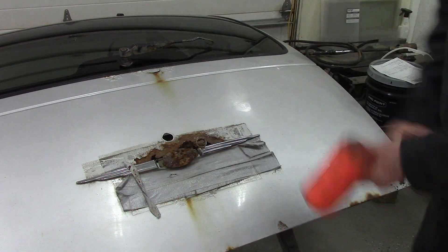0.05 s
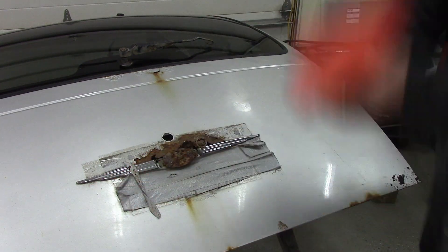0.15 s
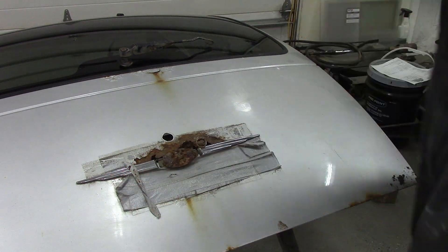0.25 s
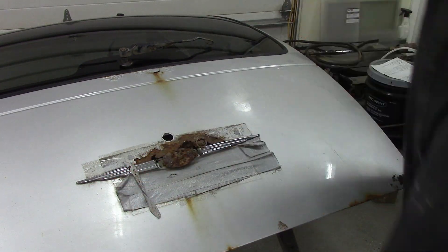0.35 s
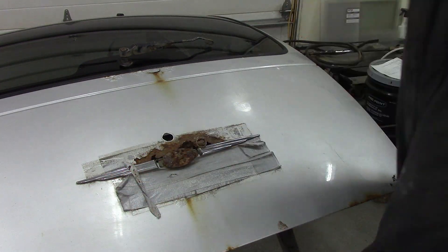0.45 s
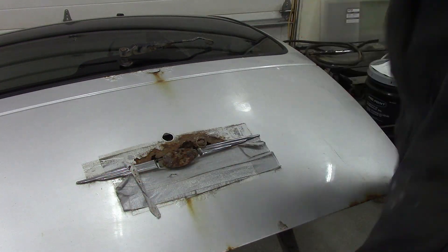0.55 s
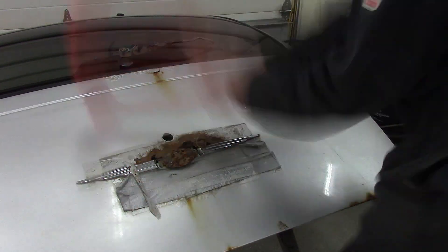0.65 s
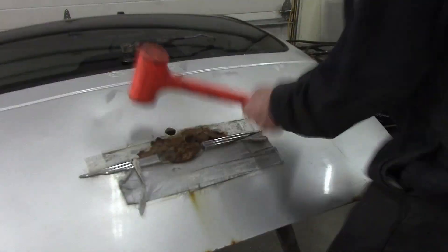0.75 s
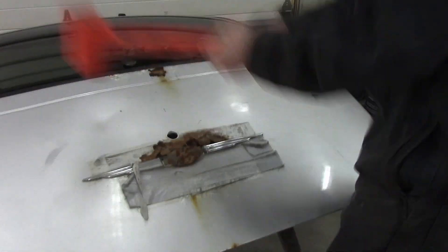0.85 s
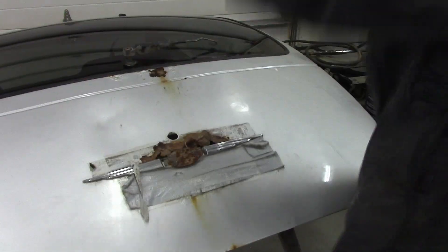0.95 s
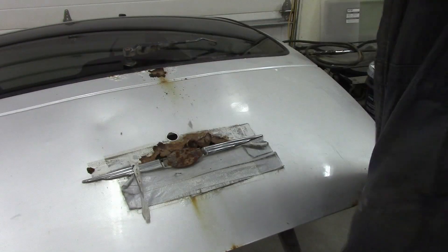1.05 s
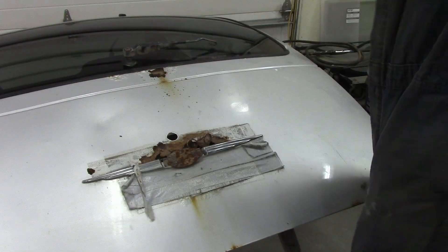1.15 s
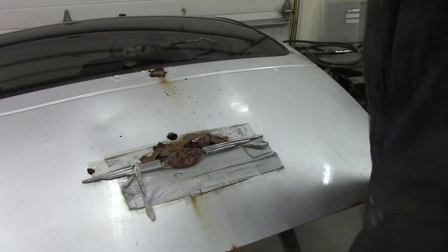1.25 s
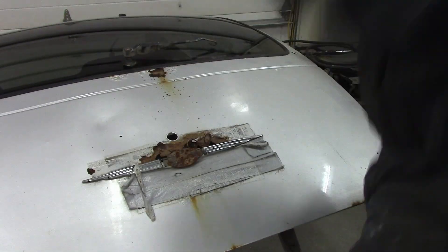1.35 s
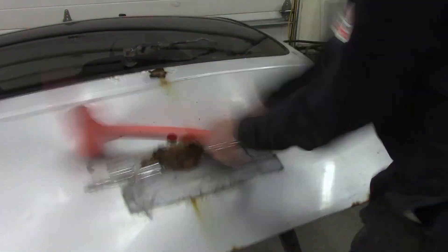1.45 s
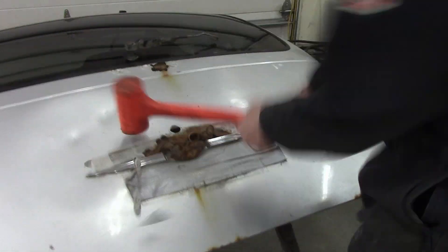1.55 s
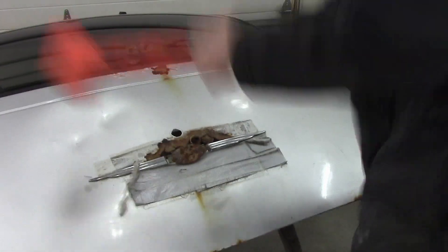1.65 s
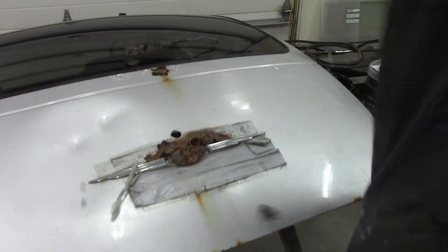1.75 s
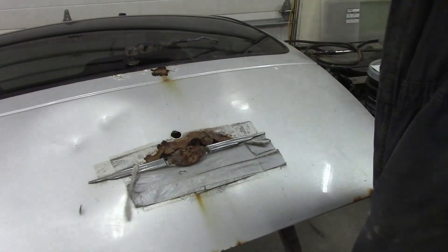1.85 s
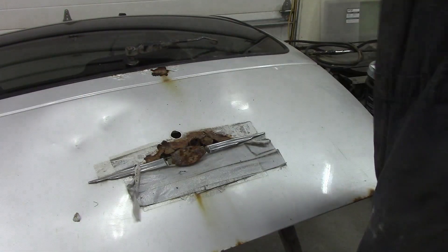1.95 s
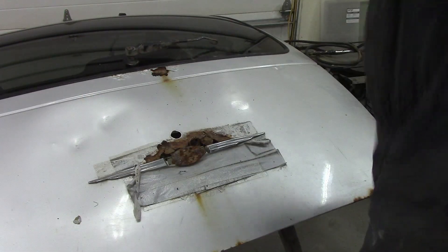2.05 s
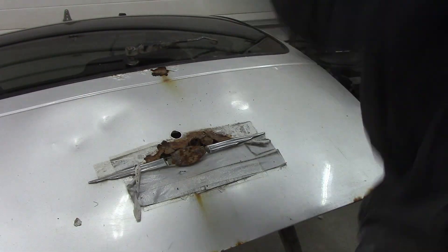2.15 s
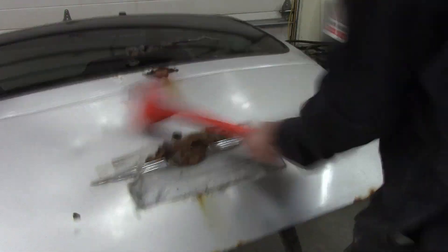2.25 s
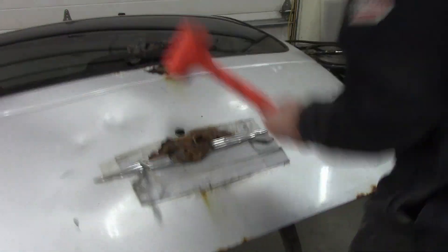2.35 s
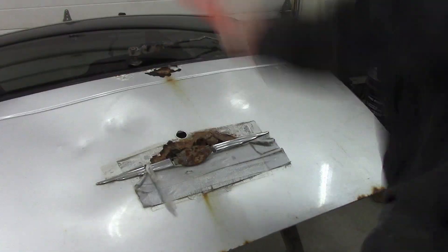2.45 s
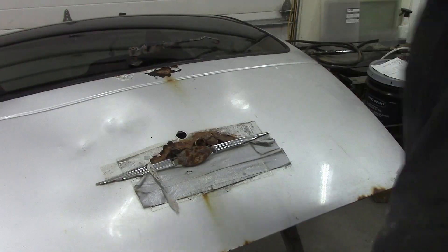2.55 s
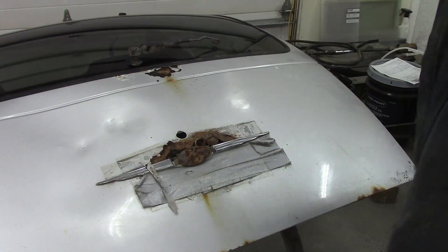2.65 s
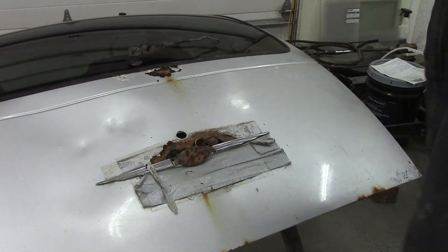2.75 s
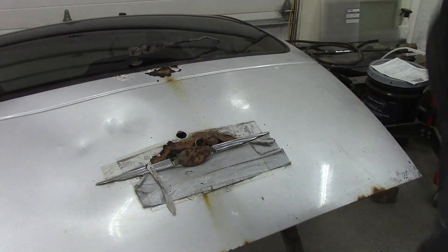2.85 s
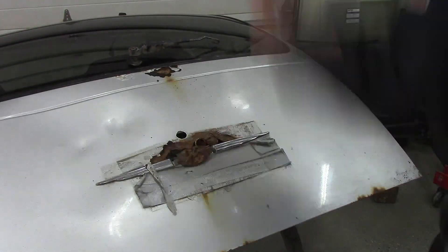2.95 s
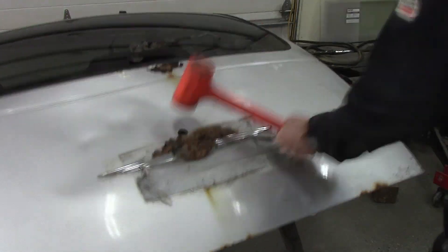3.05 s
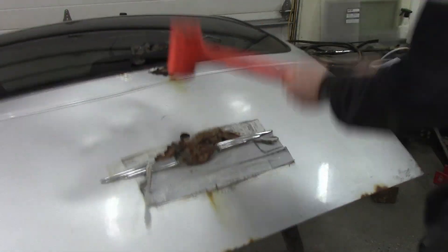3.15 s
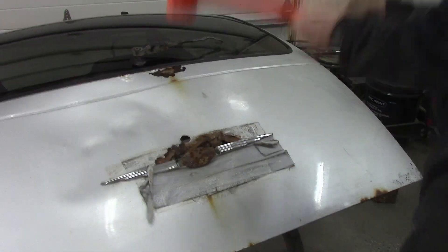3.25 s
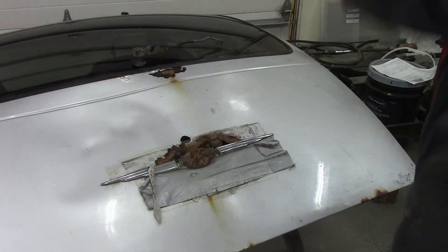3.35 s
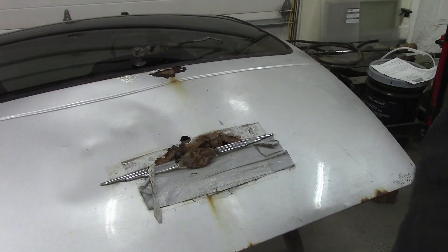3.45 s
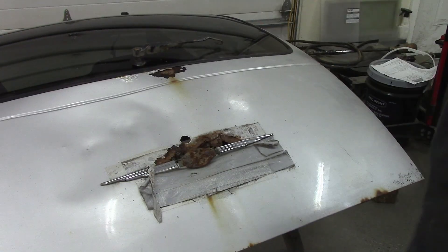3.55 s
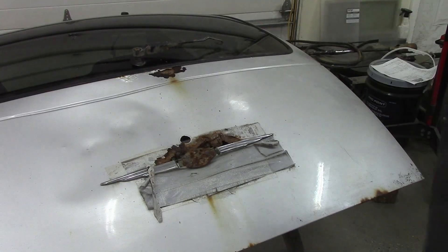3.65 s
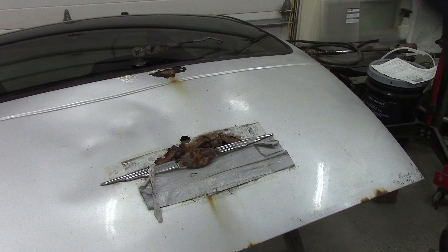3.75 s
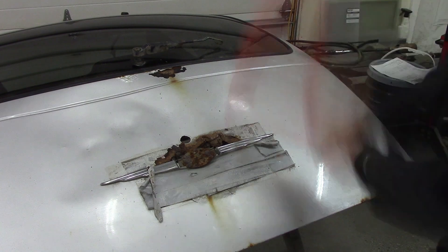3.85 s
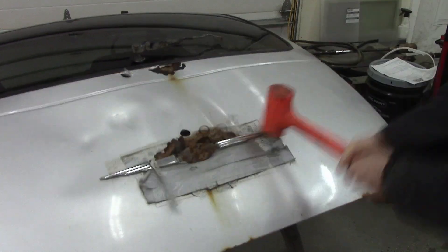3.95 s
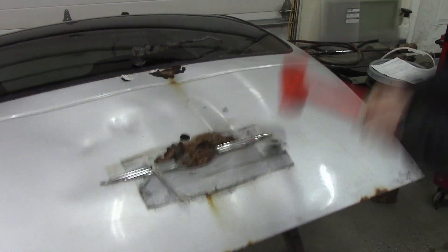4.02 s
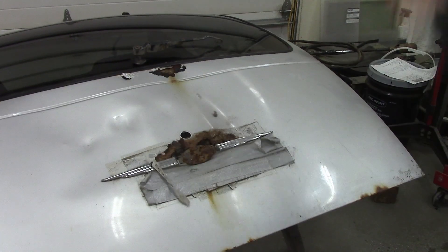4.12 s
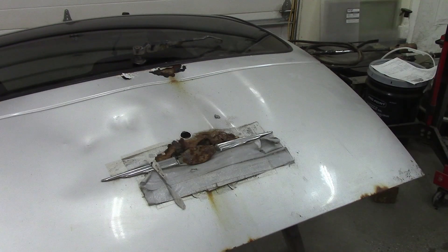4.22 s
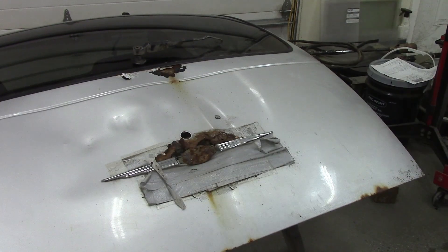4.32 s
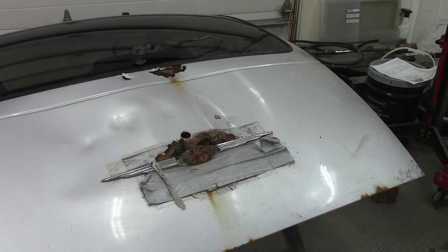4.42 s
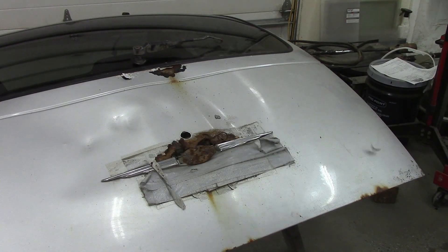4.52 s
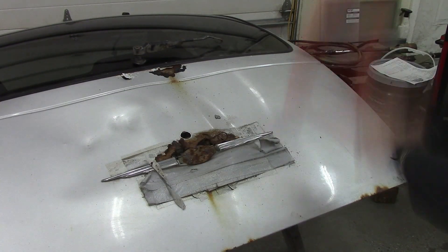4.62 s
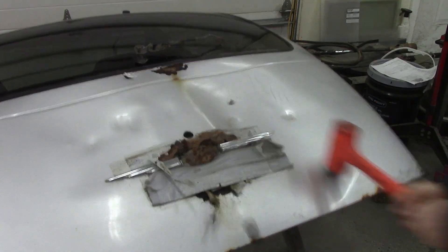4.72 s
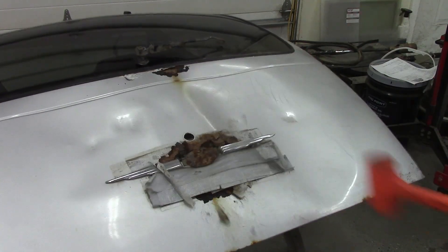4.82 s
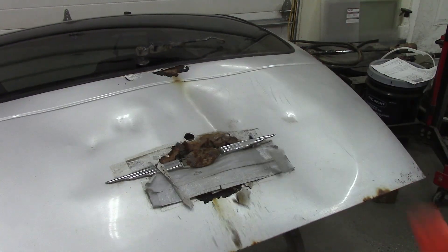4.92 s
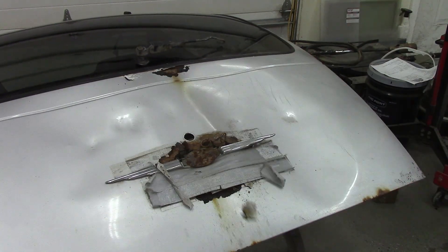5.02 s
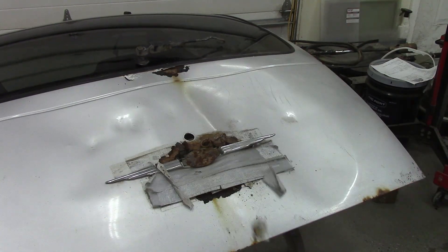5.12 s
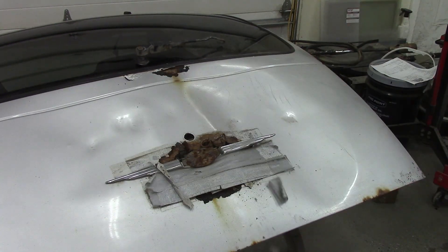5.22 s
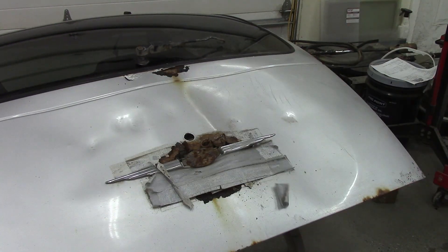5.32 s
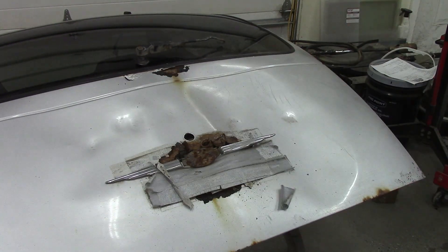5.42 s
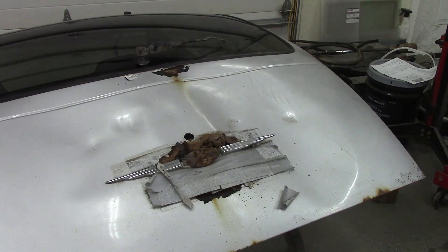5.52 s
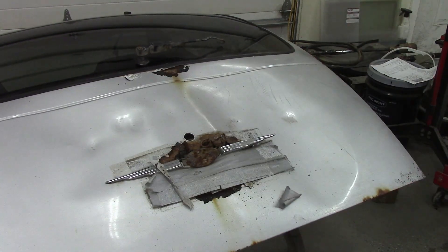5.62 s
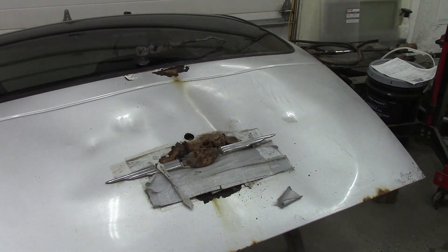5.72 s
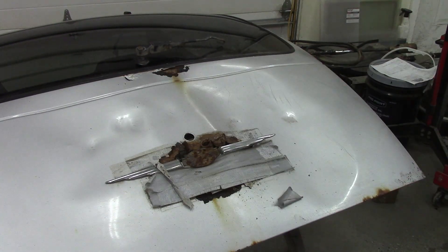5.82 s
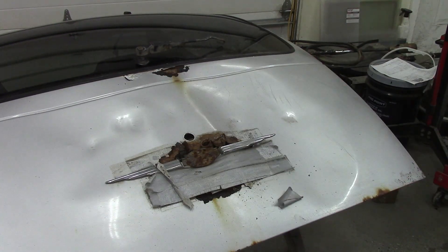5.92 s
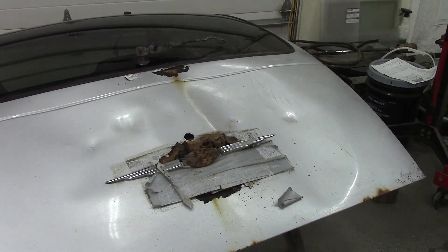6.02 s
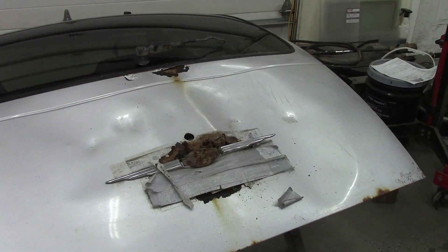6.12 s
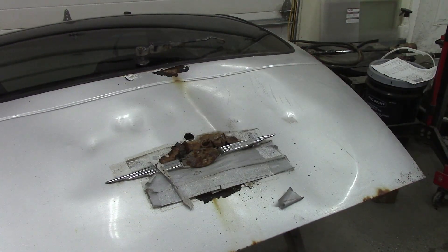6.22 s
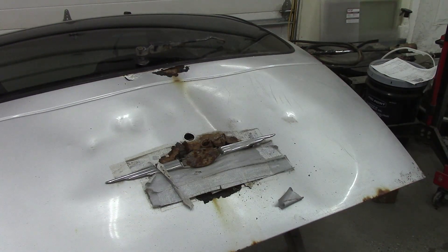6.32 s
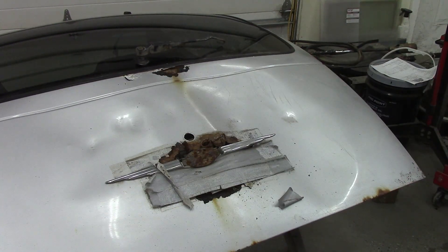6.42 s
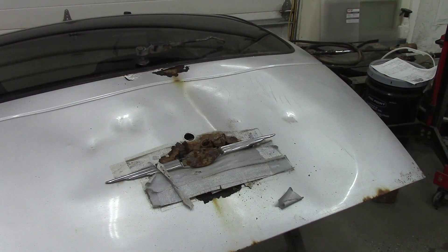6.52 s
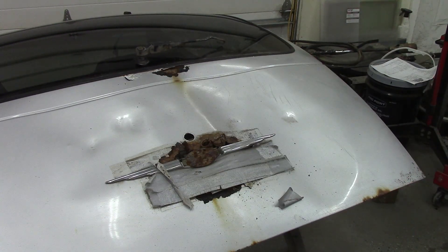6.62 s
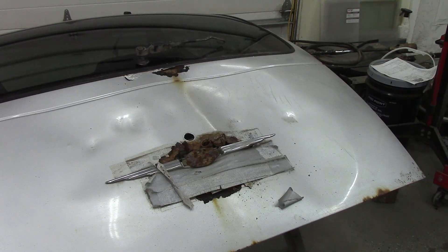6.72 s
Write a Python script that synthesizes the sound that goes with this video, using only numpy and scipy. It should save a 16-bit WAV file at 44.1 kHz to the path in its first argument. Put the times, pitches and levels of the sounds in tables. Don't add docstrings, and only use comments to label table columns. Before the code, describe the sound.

Close stereo pickup in a hard, echoing workshop. Amplified clothing rustle, zip-tab jingles and dull knocks come first, then six heavy mallet blows on a thin metal car hood. The first is deep and overloads the microphone; later ones are thinner, flat, slapping bangs. Light rust chips tick between them. At the end a small hard piece drops and bounces.

```python
import sys
import numpy as np
from scipy import signal
from scipy.io import wavfile
from scipy.ndimage import uniform_filter1d, minimum_filter1d

SR = 44100
rng = np.random.default_rng(int(sys.argv[2]) if len(sys.argv) > 2 else 0)


def waveform_to_disk(signal):
    frames = np.transpose(np.atleast_2d(signal))
    scaled = np.clip(frames, -1, 1) * 32767
    samples = np.round(scaled).astype(np.int16)
    wavfile.write(sys.argv[1], SR, samples)


def amplitude_ratio(level_db):
    exponent = np.asarray(level_db, float) / 20
    return 10 ** exponent


N = 298557

# start_s, level_db, brightness_db_per_octave, bass_db, slap_flatness_db
BLOWS = [
    (0.6822, -0.5, 0.7, 6.5, -2),
    (1.4617, 0.56, 0.48, 0.5, 11),
    (2.2448, -0.5, 1, 3.5, 11),
    (3.0154, -1.5, 0.2, -2.5, 10.5),
    (3.888, 1, 0.14, -1, 17.5),
    (4.6553, -1.4, -1.37, -7, 8),
]
# pitch_hz, width_hz, level_db
DENT_TONES = [
    [(130, 30, 6.5), (208, 14, -3), (280, 16, 4), (446, 150, 3.5), (970, 77, -10), (1250, 38, -13.5),
     (1667, 35, -17.5), (1930, 17, -18.5), (2689, 66, -19.5)],
    [(1250, 110, -3), (1500, 49, 21.5), (2260, 73, -1), (2700, 23, 8), (2800, 19, -10), (4130, 66, -12)],
    [(366, 21, 10), (1420, 26, 5), (1810, 12, 3.5), (2280, 45, -9.5), (2770, 25, 7.5), (4400, 46, 12.5)],
    [(1633, 25, 8), (2397, 36, 1), (2522, 45, -2.5), (3280, 50, 5.5), (3888, 290, -5.5), (4390, 26, -20)],
    [(820, 55, 8), (1964, 28, -2.5), (2930, 20, 11), (3930, 14, -0.5), (3940, 39, -2.5), (4420, 34, -22)],
    [(422, 43, 12), (1390, 59, 3), (1910, 93, -12), (1950, 35, -48), (2670, 25, 11), (3070, 15, 7)],
]
# pitch_hz, level_db_per_hz
PANEL_SPECTRUM = [(24, -57.5), (90, -25), (135, -6), (209, -3), (312, 0.5), (570, -2.5), (831, -4.5),
                  (1120, -8), (1520, -8.5), (2100, -10.5), (6820, -27), (14100, -49), (16000, -67.5)]
# pitch_hz, t60_s
PANEL_T60 = [(100, 0.31), (500, 0.22), (2000, 0.19), (6000, 0.081), (15000, 0.54)]
# pitch_hz, t60_s
SHOP_T60 = [(80, 0.3), (200, 0.95), (500, 1), (1200, 1.043), (2500, 1.078), (3800, 1.106), (5500, 0.94),
            (8000, 0.71), (11000, 0.63), (15000, 0.5)]
# start_s, peak_db, pitch_hz
CHIPS = [(0.9004, -35, 8350), (0.9457, -47, 7600), (1.0443, -47, 11500), (1.2266, -51.5, 10140),
         (1.4356, -49.5, 8730), (1.7363, -50, 11480), (1.9783, -56, 7620), (2.0547, -56.5, 7750),
         (2.086, -54, 11600), (2.1143, -49.5, 11200), (2.1692, -55.5, 11100), (2.1871, -52.5, 7920),
         (2.5154, -54, 8400), (2.6459, -54, 7650), (2.8614, -58.5, 8310), (2.8843, -51.5, 11000),
         (2.9254, -59.5, 10000), (3.2196, -35, 7550), (3.5979, -46, 7600), (3.7778, -60, 12150),
         (3.7922, -56.5, 12120), (4.4558, -47.5, 7720), (5.0691, -41, 10060), (5.1657, -54, 10430),
         (5.2404, -56, 7600), (5.3218, -49.5, 9410), (5.4266, -58, 10530), (5.4993, -59, 7430),
         (5.5238, -56, 9580), (5.6387, -63, 10900)]
# start_s, peak_db, pitch_hz, length_cycles, room_db
KNOCKS = [(0.103, -22.5, 530, 1.35, 0), (.463, -19.5, 700, 1.4, 6), (.471, -18.5, 542, 1.2, 2),
          (5.6, -59, 5940, 2.3, -1), (5.7958, -32.5, 1293, 0.9, -5.5), (5.8027, -24.5, 1416, 1.25, -0.5),
          (5.8054, -24, 4160, 1.42, -3), (5.8078, -21.5, 3236, 0.83, -21), (6.2911, -29, 3262, 1.24, -1.5),
          (6.2935, -38, 4313, 1.1, -10), (6.4752, -40.5, 3500, 0.62, 2), (6.4777, -35, 3240, 0.87, -6.5),
          (6.5712, -57.5, 6170, 1.5, -7.5), (6.5742, -58, 6130, 1.9, -12.5)]
# pitch_hz, level_db, t60_s
PIECE_MODES = [(1920, -27, 0.058), (3500, -31, 0.052)]
# start_s, peak_db
ZIP_HITS = [(.126, -43.5), (.2015, -24), (.206, -35), (.534, -32), (.549, -35), (.564, -31.5), (.58, -36.5),
            (2.928, -72), (3.36, -67), (3.39, -71.5), (3.42, -75), (4.577, -78)]
# pitch_hz, level_db, t60_s
ZIP_MODES = [(3800, -12, .03), (9350, -10.5, 0.014), (10800, -6.5, 0.03), (11100, -2, 0.045),
             (11600, -5, 0.028), (12300, -10, .05), (14300, -17.5, .02)]
# start_s, length_s, level_db, brightness_db_per_band
CLOTH_STROKES = [
    (-.03, 0.1, -43, 4),
    (.07, 0.13, -41.5, -2.5),
    (0.2014, 0.0051, -36.5, 3.5),
    (0.211, .06, -38.5, 0.3),
    (0.277, 0.062, -37, -2),
    (0.372, 0.11, -48, -3),
    (0.46, 0.06, -39, -3.5),
    (0.532, 0.034, -37.5, 1),
    (0.593, 0.15, -42.5, -5),
]
# low_hz, high_hz, level_db
CLOTH_BANDS = [(155, 1500, -1.5), (1500, 4900, -1.6), (4486, 7800, -0.66), (9000, 13000, -6.5)]
# pitch_hz, level_db_per_hz
AIR_SPECTRUM = [(15, -50.5), (25, -25), (659, -1), (863, -5.5), (962, 3), (1040, -8.5), (1790, -0.5),
                (6920, -14), (11300, -20.5), (16000, -38.5)]
# pitch_hz, side_minus_mid_db
WIDTH_LATE = [(60, -30), (110, -33), (200, -50.5), (380, -66), (700, -57), (1290, -39.5), (2380, -30.5),
              (4400, -17), (8120, -11), (15000, -5)]
# pitch_hz, side_minus_mid_db
WIDTH_EARLY = [(60, -11), (110, -10.5), (200, -16), (380, -15.5), (700, -16.5), (1290, -18), (2380, -19),
               (4400, -14.5), (8120, -15), (15000, -11)]
BASS_STEPS = [.72, .788, .847, .885, .93]

FIRST_BLOW_S, LAST_BLOW_S = BLOWS[0][0], BLOWS[-1][0]
OPEN_DB = 45


def evened(x):
    return x / np.sqrt(np.mean(x ** 2) + 1e-20)


def read(points, hz):
    f, value = np.transpose(points)
    return np.interp(np.log(hz + 1), np.log(f + 1), value)


def add(mix, start_s, sound):
    part = mix[round(start_s * SR):][:len(sound)]
    part += sound[:len(part)]


def minimum_phase_pulse(db):
    log_gain = np.log(amplitude_ratio(np.r_[db, db[-2:0:-1]]))
    spectrum = np.exp(np.conj(signal.hilbert(log_gain)))
    return np.fft.ifft(spectrum).real[:len(db)]


def coloured(x, points):
    pulse = minimum_phase_pulse(read(points, np.fft.rfftfreq(8192, 1 / SR)))
    return signal.oaconvolve(x, pulse)[:len(x)]


def band(x, low_hz, high_hz):
    return signal.sosfilt(signal.butter(2, [low_hz, high_hz], "band", fs=SR, output="sos"), x)


def blows():
    t = np.arange(SR // 3) / SR
    spots = (np.arange(600) + rng.random(600)) / 600
    hz = 50 + 15800 * spots ** 2
    grid_hz = np.fft.rfftfreq(4096, 1 / SR)
    decay = np.log(1000) * np.outer(t, 1 / read(PANEL_T60, hz))
    modes = np.exp(2j * np.pi * np.outer(t, hz) - decay)
    patterns = rng.standard_normal((len(BLOWS), 600, 2)) @ [1, 1j]
    near, far = np.zeros(N), np.zeros((N, 2))
    for (start_s, level_db, tilt_db, bass_db, slap_db), dent, pattern in zip(BLOWS, DENT_TONES, patterns):
        damping_per_s = 2.2 + 0.96 * slap_db
        rattle_db = -20.5 + 0.7419 * slap_db
        room_db = -2 - 0.1209 * slap_db

        def colour_db(f):
            return read(PANEL_SPECTRUM, f) + tilt_db * np.log2(f / 1500 + .01) + bass_db / (1 + (f / 500) ** 2)

        strength = pattern * amplitude_ratio(colour_db(hz)) * np.sqrt(spots + .01)
        plate = evened((modes @ strength).real)
        tones = sum(amplitude_ratio(db) * np.sin(2 * np.pi * f * t) * np.exp(-1.5 * width_hz * t) for f, width_hz, db in dent)
        sound = plate + amplitude_ratio(-15.0) * evened(tones)
        sound = sound * np.exp(-damping_per_s * t) * (1 - np.exp(-t / 0.00021))
        sound = sound * (0.67 + 0.75 * (1 - np.exp(-t / 0.004)))
        slap = band(rng.standard_normal(len(t)), 2200, 11000)
        slap = slap * (amplitude_ratio(slap_db) * np.exp(-t / 0.0014) + amplitude_ratio(rattle_db) * np.exp(-t / 0.044))
        sound = amplitude_ratio(level_db - 22) * (sound + slap)
        pulse = minimum_phase_pulse(colour_db(grid_hz))
        all_round = amplitude_ratio(-15.0) * sound
        add(all_round, 0, pulse * np.linalg.norm(sound) / np.linalg.norm(pulse))
        add(near, start_s, sound)
        add(far, start_s, amplitude_ratio(room_db) * shop(all_round, size=3 * SR // 2).T)
    return near, far.T


def chips():
    t, out = np.arange(2500) / SR, np.zeros(N)
    t60_s = 0.03
    for (start_s, peak_db, hz), noise in zip(CHIPS, rng.standard_normal((len(CHIPS), len(t)))):
        burst = band(noise, hz * 0.71, min(hz * 1.25, 17000)) * amplitude_ratio(-60 * t / t60_s)
        add(out, start_s, amplitude_ratio(peak_db - 5.5) * burst / abs(burst).max())
    return out


def grit():
    t = np.arange(N) / SR
    grains_per_s, grain_fade_s = 200, .004
    size = amplitude_ratio(3.5 * np.minimum(rng.exponential(1, N), 4)) * (rng.random(N) < grains_per_s / SR)
    envelope = signal.lfilter([1], [1, -np.exp(-1 / (grain_fade_s * SR))], size)
    grains = band(rng.standard_normal(N) * envelope, 5500, 12500)
    level_db = -85 + np.interp(t, [0, .7, .9, 5.4, 5.75], [-64.5, -62, 0.5, -8, -18])
    return amplitude_ratio(level_db) * evened(grains)


def knocks():
    near, far = np.zeros(N), np.zeros((N, 2))
    t, t_ring = np.arange(600) / SR, np.arange(SR // 3) / SR
    thump = 0.2 * signal.lfilter([1], [1, -.93], band(signal.unit_impulse(600), 170, 3100))
    ring = sum(amplitude_ratio(db - 60 * t_ring / t60_s) * np.sin(2 * np.pi * f * t_ring) for f, db, t60_s in PIECE_MODES)
    noises = rng.standard_normal((len(KNOCKS), 600))
    for (start_s, peak_db, hz, cycles, room_db), noise in zip(KNOCKS, noises):
        u = t * hz
        early_db = OPEN_DB * (start_s < FIRST_BLOW_S)
        sound = amplitude_ratio(peak_db + 11.5 - early_db) * np.sin(2 * np.pi * u) * u * np.exp(1 - 4.0 * u / cycles)
        sound += 0.23 * np.diff(sound, prepend=0) * SR / hz / 6
        chatter = band(noise, hz, hz * 2.2) * np.exp(-np.arange(600) / 130)
        add(near, start_s, sound + amplitude_ratio(peak_db - 28.5 - early_db) * chatter)
        rung = amplitude_ratio(peak_db) * ring * (start_s > LAST_BLOW_S)
        add(near, start_s, rung)
        add(far, start_s, shop(amplitude_ratio(-1.5) * rung, size=SR // 2).T)
        into_room = amplitude_ratio(room_db - 4.5) * sound + amplitude_ratio(peak_db + 12 - early_db) * thump
        add(far, start_s, shop(into_room, size=SR).T)
    return near, far.T


def zip_pull():
    t, out = np.arange(5000) / SR, np.zeros(N)
    shakes = rng.normal(0, 1, (len(ZIP_HITS), len(ZIP_MODES)))
    for (start_s, peak_db), shake in zip(ZIP_HITS, shakes):
        ring = sum(amplitude_ratio(db + 2.8 * uneven - 60 * t / t60_s) * np.sin(2 * np.pi * f * t)
                   for (f, db, t60_s), uneven in zip(ZIP_MODES, shake))
        early_db = OPEN_DB * (start_s < FIRST_BLOW_S)
        add(out, start_s, amplitude_ratio(peak_db + 1.0 - early_db) * ring)
    return out


def cloth():
    t, out = np.arange(int(FIRST_BLOW_S * SR)) / SR, np.zeros((2, N))
    rise_s, fade_s = 0.0034, 0.032
    start_s, length_s, level_db, tilt_db = np.transpose(CLOTH_STROKES)[:, :, None]
    stroke = np.clip((t - start_s) / rise_s, 0, 1) * np.exp(-np.maximum(t - start_s - length_s, 0) / fade_s)
    for k, (low_hz, high_hz, band_db) in enumerate(CLOTH_BANDS):
        snaps = rng.standard_normal((2, len(t))) * amplitude_ratio(2.0 * rng.exponential(1, len(t)))
        stroke_db = level_db + band_db + tilt_db * (k - 1) - OPEN_DB
        level = np.linalg.norm(stroke * amplitude_ratio(stroke_db), axis=0)
        out[:, :len(t)] += level * evened(band(snaps, low_hz, high_hz))
    return out


def sleeve():
    swish = evened(band(rng.standard_normal((2, N)), 4000, 6800))
    swings = np.interp(np.arange(N) / SR, [row[0] for row in BLOWS], np.arange(len(BLOWS)))
    phase = swings % 1
    arch = np.sin(np.pi * phase ** 1.6 * .8)
    return amplitude_ratio(-74.5 - 22 * (1.5 - arch)) * (phase > 0) * swish


def shop(x, size):
    taps = np.zeros((2, size))
    at = np.arange(20, size - 20, 10) + rng.integers(0, 10, (2, (size - 40) // 10))
    np.put_along_axis(taps, at, rng.choice([-1., 1.], at.shape), 1)
    hz, t, z = signal.stft(taps, SR, nperseg=512)
    decay = amplitude_ratio(-60 * t / read(SHOP_T60, hz)[:, None])
    tail = signal.istft(z * decay, SR, nperseg=512)[1][:, :size]
    late_s = np.maximum(np.arange(size) / SR - .0015, 0)
    tail = tail * (1 - np.exp(-late_s / 0.00073)) * (1 + 0.38 * np.exp(-late_s / 0.11))
    tail = tail * (1 + 0.67 * np.exp(-((late_s - 0.07) / 0.0052) ** 2))
    return signal.fftconvolve(x[None], tail / np.linalg.norm(tail[0]), axes=1)


def room_tone():
    air = np.array([evened(coloured(noise, AIR_SPECTRUM)) for noise in rng.standard_normal((2, N))])
    rumble = evened(band(rng.standard_normal((2, N)), 68, 92))
    return amplitude_ratio(-86) * air + amplitude_ratio(-106) * rumble


def gain_control(t):
    clamp_s, settle_s = .6842, 0.004
    cut = 1 / (1 + np.exp(-(t - 1.2) / 0.051))
    makeup_db = 10 * cut * (1 - cut)
    shut_db = 5.5 + 10 * np.exp(-np.maximum(t - clamp_s, 0) / settle_s) + makeup_db
    gain_db = uniform_filter1d(np.where(t < clamp_s, 43.5, shut_db), size=40)
    creep_db = sum(118 * (t - a) * (t >= a) * (t < b) for a, b in zip(BASS_STEPS, BASS_STEPS[1:]))
    bass_db = uniform_filter1d(creep_db, size=100) - 1.5 - 32 * cut
    return gain_db, bass_db


def scene():
    hit, hit_far = blows()
    tap, tap_far = knocks()
    small = chips() + grit()
    small_far = shop(amplitude_ratio(-5) * small, size=SR)[:, :N]
    diffuse = hit_far + tap_far + small_far + cloth() + sleeve() + room_tone()
    near = hit + tap + small + zip_pull()
    mid = near + diffuse[0]
    side = amplitude_ratio(0.25) * diffuse[1] + amplitude_ratio(-4.0) * near
    wide = np.interp(np.arange(N) / SR, [.9, 1.2], [1, 0])
    side = wide * coloured(side, WIDTH_EARLY) + (1 - wide) * coloured(side, WIDTH_LATE)
    return np.array([mid - side, mid + side])


def low_pass(x):
    return signal.sosfilt(signal.butter(12, 16360, fs=SR, output="sos"), x)


def record(dry):
    t = np.arange(N) / SR
    gain_db, bass_db = gain_control(t)
    mic = signal.sosfilt(signal.butter(3, [90, 14200], "band", fs=SR, output="sos"), dry)
    mic = mic + amplitude_ratio(-13.5) * band(mic, 2430, 4230)
    thin = signal.lfilter(*signal.butter(1, 1825, "high", fs=SR), mic)
    x = (thin + amplitude_ratio(bass_db) * (mic - thin)) * amplitude_ratio(gain_db)
    peak = -minimum_filter1d(-abs(x).max(0) * (t > .69), size=200)
    squeeze = uniform_filter1d(np.minimum(1, .92 / (peak + 1e-9)), size=100)
    x = np.clip(x * squeeze, -1, 1)
    overload = np.exp(-((t - .6842) / .006) ** 2)
    x = x + overload * (band(x, 70, 8000) - x)
    finished = np.clip(1.039 * x, -1, 1)
    return low_pass(finished)


dry = scene()
out = record(dry)
waveform_to_disk(out)
```